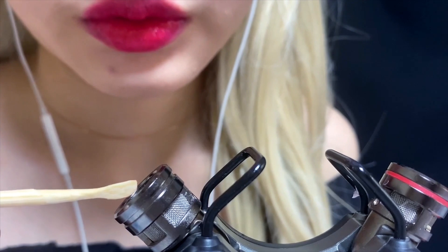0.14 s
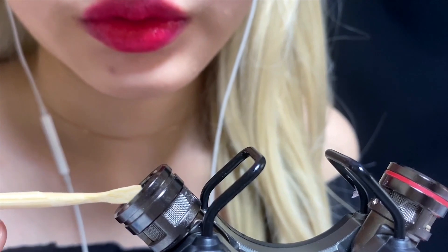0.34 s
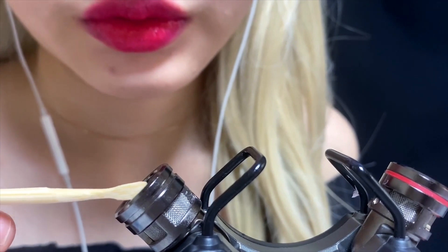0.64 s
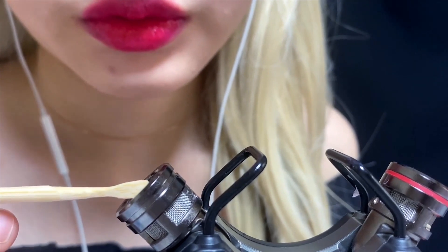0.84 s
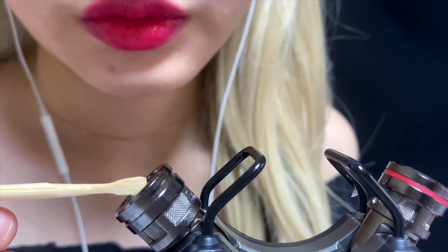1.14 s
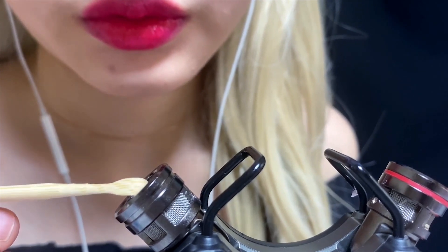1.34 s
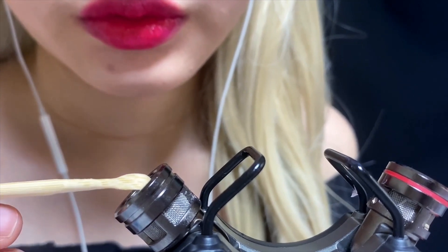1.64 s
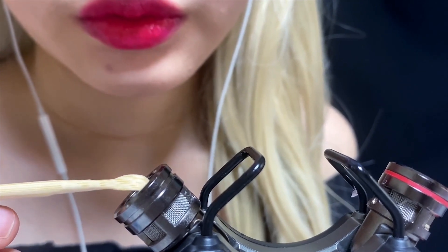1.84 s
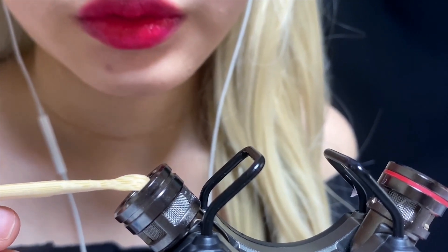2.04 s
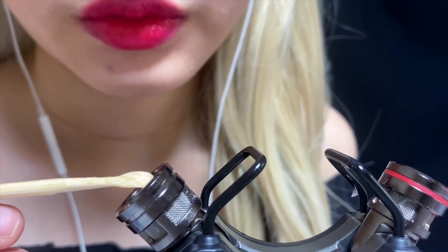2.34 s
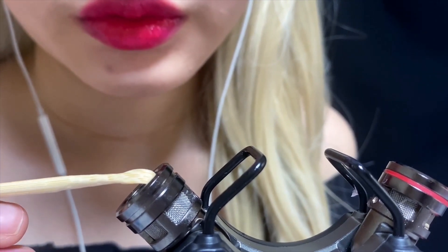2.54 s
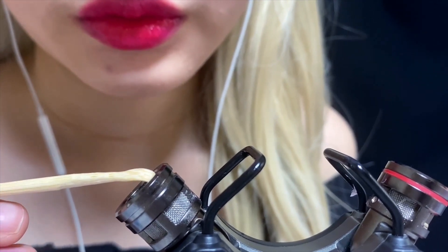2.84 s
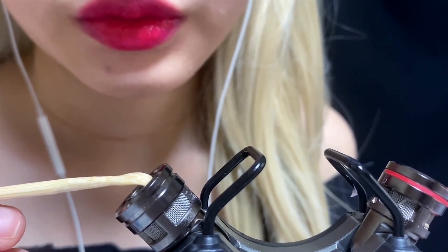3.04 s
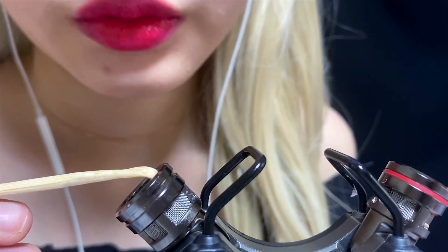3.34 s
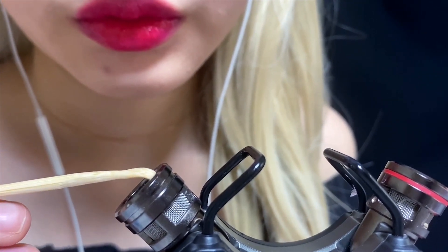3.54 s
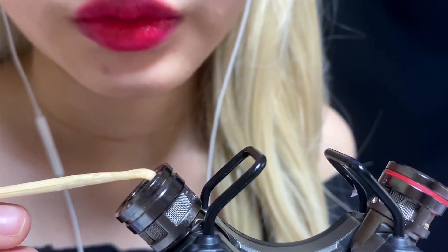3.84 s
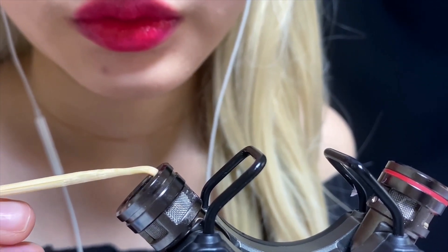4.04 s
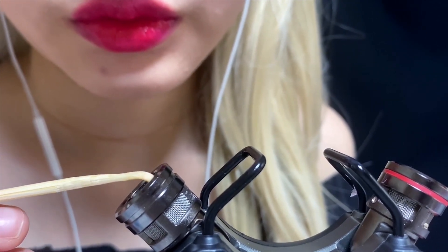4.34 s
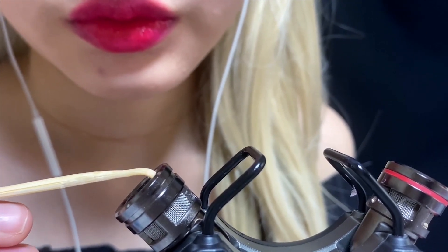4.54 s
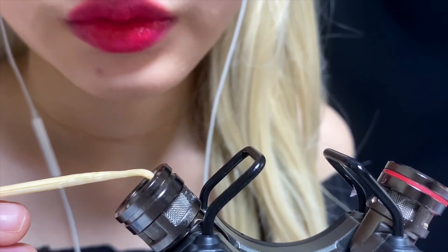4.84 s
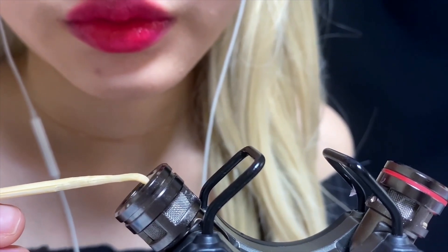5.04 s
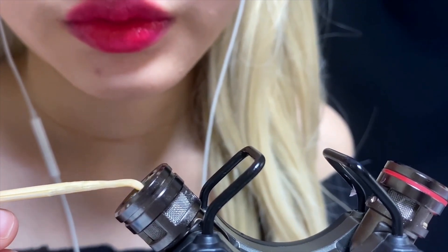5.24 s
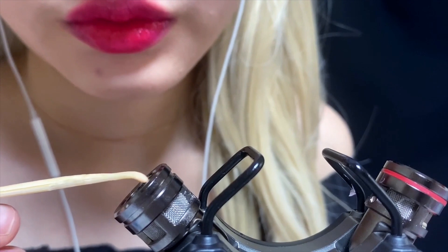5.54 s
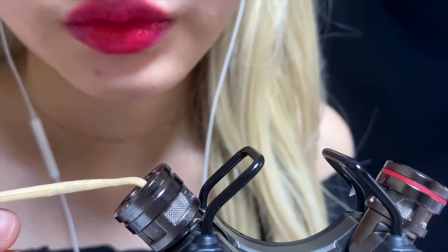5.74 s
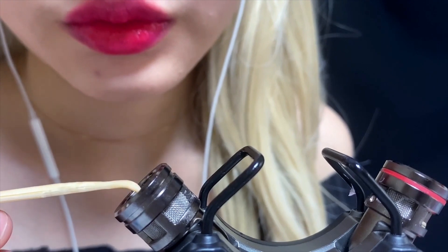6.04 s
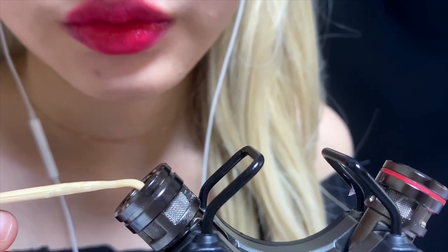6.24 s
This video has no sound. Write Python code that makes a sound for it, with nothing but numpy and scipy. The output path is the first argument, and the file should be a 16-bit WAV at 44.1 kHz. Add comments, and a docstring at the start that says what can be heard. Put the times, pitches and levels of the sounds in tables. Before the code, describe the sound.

Close dry scratching and clicking of a wooden stick on a microphone grille, sparse at first, then busier, over faint room hiss.

```python
"""In a quiet room, a wooden ear pick pokes and scrapes the mesh of the right capsule of a stereo microphone pair.
Each poke or slip is a short push on the grille; dragging makes dense stick-slip grains and a thin rub.
The left capsule hears it mainly through the ringing mount, which also rocks at a low pitch.
Contact sounds are pulses and noise shaped by resonances; quiet hiss and a fading midrange wash lie beneath."""
import sys
import numpy as np
from scipy.fft import rfft, irfft, next_fast_len
from scipy.io import wavfile
from scipy.ndimage import uniform_filter1d, map_coordinates

SR = 44100
rng = np.random.default_rng(int(sys.argv[2]) if len(sys.argv) > 2 else 0)


def output_pcm(signal):
    """Save a mono or channel-first signal as 16-bit PCM at the path in sys.argv[1].

    Samples are clipped to [-1, 1] before scaling.
    """
    pcm = np.clip(np.atleast_2d(signal).T, -1, 1) * 32767
    wavfile.write(sys.argv[1], SR, np.round(pcm).astype(np.int16))


N = 281117  # length [samples]


def amp(db):
    """Logarithmic level: decibels to amplitude gain."""
    return 10 ** (np.asarray(db) / 20)


def unit(x):
    """Power normalisation: scale to rms 1."""
    return x / np.sqrt(np.mean(x ** 2) + 1e-20)


def noise(*shape):
    """White Gaussian noise: equal mean power at all frequencies."""
    return rng.standard_normal(shape + (N,))


def filtered(x, response):
    """Linear filtering: the spectrum of x times a complex response of frequency."""
    size = 2 * next_fast_len(N // 2 + SR // 4)  # zero padding leaves room for the ringing
    spectrum = rfft(x, size)
    hz = np.fft.rfftfreq(size, 1 / SR)
    return irfft(spectrum * response(hz), size)[..., :N]


def colour(points):
    """Minimum phase: a causal response through (frequency [Hz], level [dB]) points."""
    def response(hz):
        f, db = np.transpose(points)
        level_db = np.interp(np.log(hz + 1), np.log(f), db)
        cepstrum = irfft(np.log(amp(level_db)))
        half = len(cepstrum) // 2
        # folding the cepstrum onto positive times makes the response causal
        cepstrum[1:half] *= 2
        cepstrum[half + 1:] = 0
        return np.exp(rfft(cepstrum))
    return response


def modes(table):
    """Modal superposition: a causal sum of (frequency [Hz], width [Hz], level [dB]) resonances."""
    def response(f):
        total = 0
        for k, (centre, width, db) in enumerate(table):
            resonance = 1j * f * width / (centre * centre - f * f + 1j * f * width)
            total = total + (-1) ** k * amp(db) * resonance  # successive modes alternate in sign
        return total
    return response


def boosted(points, table):
    """Resonant emphasis: a causal colour with narrow (frequency [Hz], width [Hz], level [dB]) peaks on top."""
    def response(f):
        peaks = [1 + (amp(db) - 1) * modes([(centre, width, 0)])(f) for centre, width, db in table]
        return colour(points)(f) * np.prod(peaks, axis=0)
    return response


def grains(rate, spread_db):
    """Poisson-like impulses: tiny catches at random moments and of random size, rate a second."""
    happens = rng.random(N) < rate / SR
    sign = rng.choice([-1, 1], N)
    return happens * sign * amp(spread_db * noise())


def even(x, seconds):
    """Envelope normalisation: hold the running rms near 1 and keep the finer grain."""
    x = unit(x)
    size = max(int(seconds * SR), 2)
    power = uniform_filter1d(uniform_filter1d(x ** 2, size), size)
    return x / np.sqrt(np.abs(power) + 1e-3)


def wobble(rate):
    """Band-limited fluctuation: a smooth random curve, rate knots a second."""
    knots = rng.standard_normal(int(N * rate / SR) + 4)
    return map_coordinates(knots, [np.arange(N) * rate / SR])


def add(track, s, sound):
    """Superposition: mix a short sound in at time s."""
    part = track[max(round(s * SR), 0):][:len(sound)]
    part += sound[:len(part)]


def gesture(start, length, attack, release, swell_db=0):
    """Exponential envelope of one movement: rise, a hold that swells or fades, fall."""
    t = np.arange(N) / SR - start
    outside = np.maximum(-t, 0) / attack + np.maximum(t - length, 0) / release
    near = outside < 10
    progress = np.clip(t[near] / length, 0, 1)
    gain = np.zeros(N)
    gain[near] = np.exp(-outside[near]) * amp(swell_db * (progress - .5))
    return gain


# spectrum of the quiet room and preamplifier: (frequency [Hz], relative density [dB per Hz])
FLOOR = [(20, -78.5), (60, -83), (120, -91.5), (250, -93.5), (600, -103.5), (950, -105), (1400, -108),
         (1950, -107), (2700, -113), (9000, -113.5), (16000, -115)]
# spectrum of a faint midrange wash in the room: (frequency [Hz], relative density [dB per Hz])
WASH = [(300, -12.5), (950, 1), (1400, -5.5), (1950, -2), (2600, -8.5), (4000, -20)]
WASH_DB, WASH_FADE_DB_PER_S = -70.5, 0.46


def floor():
    """Incoherent noise: steady hiss, separate in each capsule, and a midrange wash that slowly fades."""
    hiss = amp(-61.0) * unit(filtered(noise(2), colour(FLOOR)))
    wash = unit(filtered(noise(2), colour(WASH)))
    wash_gain = amp(WASH_DB - WASH_FADE_DB_PER_S * np.arange(N) / SR)
    return hiss + wash_gain * wash


# strokes of the pick over the mesh, levels relative within each layer:
# (start [s], length [s], swell from start to end [dB], stick-slip [dB], smooth rub [dB],
#  mesh grit [dB], rocking of the mount [dB])
STROKES = [(0.377, .18, -6, -67, -82, -88, -56), (0.59, 0.068, 5, -49, -59.5, -72, -50),
           (0.659, 0.043, -2, -50.5, -67, -76, -45), (0.974, 0.16, -1, -61, -68, -90, -76),
           (1.347, 0.13, 10, -54, -65.5, -79, -54), (1.545, 0.015, 3, -40.5, -75, -83, -58),
           (1.69, 0.022, 10, -29, -54, -56, -52), (1.727, 0.064, -16, -49, -68, -70, -52),
           (2.079, 0.018, 6, -49.5, -65, -82, -46), (2.236, 0.026, 6, -58.5, -60.5, -80, -50),
           (2.376, 0.044, 1, -51.5, -47.5, -64, -42), (2.617, 0.057, -10.5, -43, -52, -76, -39.5),
           (2.845, .025, 7.5, -40.5, -66, -78, -51.5), (2.883, 0.11, -6, -51, -59, -79, -58),
           (3.188, 0.099, -7, -50.5, -52.5, -73, -39.5), (3.309, 0.038, -7, -52.5, -53, -79, -40),
           (3.365, 0.03, 6, -44.5, -56.5, -72, -47), (3.555, .022, 11, -44, -59, -72, -51),
           (3.615, 0.068, -19, -47.5, -56, -81, -51), (3.792, 0.062, 6, -47.5, -51, -78, -41),
           (3.876, 0.062, 2, -48, -49.5, -71.5, -39.5), (4.081, 0.029, -0.5, -37.5, -42.5, -69, -45),
           (4.179, 0.049, 18.5, -35, -51, -68, -56), (4.245, 0.034, -14.5, -39.5, -51.5, -63, -46),
           (4.373, 0.071, 10, -57, -64.5, -82, -55), (4.453, 0.02, 3.5, -37, -45, -61, -39.5),
           (4.552, 0.012, 0, -28, -44, -66, -54), (4.564, 0.0052, -3.5, -27, -30, -43, -31),
           (4.601, 0.02, -8, -29, -40.5, -56, -36.5), (4.631, 0.04, -16, -56, -63, -83, -43),
           (4.81, 0.037, -7, -46.5, -48, -84, -41), (4.844, .18, 0, -55, -57.5, -75, -52),
           (5.037, 0.18, -1, -61, -61.5, -82, -51.5), (5.222, 0.077, 1, -53.5, -53.5, -80, -49),
           (5.417, 0.026, -1, -45, -50.5, -75, -44), (5.698, 0.039, -1, -47, -60, -71, -46),
           (5.755, 0.055, -7.5, -32.5, -49, -59.5, -48), (5.825, 0.0083, 0, -22.5, -37, -53, -41),
           (5.838, 0.062, -9.5, -38.5, -55, -60, -52), (6.012, 0.019, -6, -55.5, -56.5, -72, -50),
           (6.304, 0.061, -5, -51.5, -62, -69.5, -55)]


def stroking(attack, release):
    """Energy addition: gains of stick-slip, rub, grit and rocking, summed in power over all strokes."""
    power = np.zeros((4, N))
    for start, length, swell_db, *levels_db in STROKES:
        gain = gesture(start, length, attack, release, swell_db)
        near = gain > 0
        power[:, near] += np.outer(amp(levels_db), gain[near]) ** 2
    return np.sqrt(power)


# the hand leans on the capsule through the resting pick: (start [s], length [s], relative flexing [dB])
LEANS = [(0.507, 0.095, -37), (1.69, 0.055, -31), (2.109, 0.21, -34.5), (2.361, 0.074, -28.5),
         (2.462, 0.4, -41.5), (3.27, 0.15, -37), (5.784, 0.15, -29), (5.983, 0.25, -36.5)]


def leaning():
    """Quasi-static loading: the gain of the flexing rises and falls with the hand's pressure."""
    return sum(amp(db) * gesture(start, length, attack=0.0057, release=0.014) for start, length, db in LEANS)


# deep flexing of the pressed capsule: (frequency [Hz], relative density [dB per Hz])
FLEX = [(8, -8), (25, -0.5), (55, 2), (90, -12.5), (160, -31.5), (1000, -71)]
FLEX_PER_SLIP_DB, REST_FLEX_DB = -3.5, -53.5  # friction also flexes the capsule; the held pick is never quite still


def flexing(friction):
    """Forced elastic deformation: pressure and friction drive low-frequency noise in the touched capsule."""
    touched = np.hypot(leaning(), amp(FLEX_PER_SLIP_DB) * friction) + amp(REST_FLEX_DB)
    return touched * even(filtered(noise(), colour(FLEX)), 0.11)


# rocking of the mount: (frequency [Hz], relative density [dB per Hz])
SWAY = [(10, -13), (35, -9), (68, 0.5), (95, -6.5), (150, -17), (260, -26), (1500, -76)]
# the arm of the mount swings at one pitch: (frequency [Hz], width [Hz], peak over the rocking colour [dB])
ARM = [(63.3, 18, 2.5)]
SWAY_ATTACK_S, SWAY_RELEASE_S = 0.0069, 0.021  # the heavy mount follows more slowly than the tip
REST_ROCK_DB = -72


def rumble():
    """Low-frequency resonance: the hand flexes the capsule and rocks the mount, swinging the capsules oppositely."""
    friction, _, _, rocking = stroking(SWAY_ATTACK_S, SWAY_RELEASE_S)
    rocking = np.hypot(rocking, amp(REST_ROCK_DB))
    flex = flexing(friction)
    sway = rocking * even(filtered(noise(), boosted(SWAY, ARM)), 0.068)
    twist = rocking * even(filtered(noise(), colour(SWAY)), 0.012)
    left = 0.65 * twist - 0.6 * sway
    right = amp(-4.5) * flex + amp(2.0) * sway
    return np.array([left, right])


# smooth wood gliding on the mesh: (frequency [Hz], relative density [dB per Hz])
RUB = [(300, 3.5), (700, -3), (1500, -7.5), (2600, 5), (3100, -2), (3900, -19.5)]
# the capsule housing under a light rub: (frequency [Hz], width [Hz], peak over the rub colour [dB])
HOUSING = [(963, 68, 15.5), (1160, 120, 10.5), (1926, 60, -7.5)]


def smooth_rub(fibres):
    """Sliding friction: a dense run of tiny contacts excites the housing's resonances."""
    return even(filtered(fibres, boosted(RUB, HOUSING)), 0.018)


# stick-slip on the grille: (frequency [Hz], relative density [dB per Hz])
SLIPS = [(40, -22), (140, 8.5), (280, 4), (480, -4), (700, -6.5), (950, -11.5), (1400, -18.5), (2200, -29),
         (4000, -47.5)]
# the cap of the grille: (frequency [Hz], width [Hz], peak over the stick-slip colour [dB])
GRILLE = [(627, 35, 3), (732, 39, 8), (900, 51, -4), (1109, 52, 6.5)]


def stick_slip(catches):
    """Stick-slip friction: each catch of the tip releases a pulse that rings the cap of the grille."""
    return even(filtered(catches, boosted(SLIPS, GRILLE)), 0.015)


# wood fibres on the wires: (frequency [Hz], relative density [dB per Hz])
GRIT = [(1000, 2.5), (2500, 5.5), (3200, -0.5), (4500, 1.5), (8000, -13.5), (11000, -8.5), (16000, -23)]
# single wires ringing: (frequency [Hz], width [Hz], peak over the grit colour [dB])
WIRES = [(3920, 350, 3), (5430, 88, 2), (9840, 200, 6), (10720, 220, 4.5)]


def rasp(x):
    """Resonant excitation: a broad crackle of the mesh with the wires ringing in it."""
    return filtered(x, boosted(GRIT, WIRES))


# the mesh sings faintly when stroked lightly: (frequency [Hz], width [Hz], relative level [dB])
MESH = [(5870, 320, -4), (9100, 410, -1)]


def mesh_song(fibres):
    """Modal ringing: a light stroke keeps two bands of the mesh singing."""
    return even(filtered(fibres, modes(MESH)), 0.029)


# the mount as the left capsule hears it: (frequency [Hz], width [Hz], relative level [dB])
MOUNT = [(700, 50, -4), (838, 21, 4.5), (932, 41, 0.5), (1200, 92, -18.5), (1880, 104, -16),
         (2225, 150, -9.5), (2620, 140, -15.5)]


def mount_ring(excitation):
    """Structure-borne sound: contact forces excite the normal modes of the mount."""
    return filtered(excitation, modes(MOUNT))


STROKE_ATTACK_S, STROKE_RELEASE_S = 0.0031, 0.0059  # the tip bites and lifts
REST_RUB_DB = -84  # the held pick still rubs a little


def drag():
    """Friction-driven vibration: the tip catches and slips over the wires; a light touch rubs and sings."""
    slip_gain, rub_gain, grit_gain, _ = stroking(STROKE_ATTACK_S, STROKE_RELEASE_S)
    rub_gain = np.hypot(rub_gain, amp(REST_RUB_DB))
    rub_gain = rub_gain * amp(3.14 * wobble(45))  # the tip never glides quite evenly
    catches = grains(rate=750, spread_db=5.0)
    fibres = grains(rate=2500, spread_db=4.5)
    slips = slip_gain * stick_slip(catches)
    rub = rub_gain * smooth_rub(fibres)
    grit = grit_gain * even(rasp(fibres + catches), 0.0065)
    light = rub_gain / (1 + slip_gain / amp(-61))  # firm pressure damps the mesh
    mesh = light * mesh_song(fibres)
    shake = np.hypot(amp(-7.5) * rub_gain, amp(-22.5) * slip_gain)
    ring = shake * even(mount_ring(fibres + .5 * catches), .025)
    travel_s = 0.00057  # along the mount
    ring = filtered(ring, lambda hz: np.exp(-2j * np.pi * hz * travel_s))
    left = ring + amp(-12) * grit - amp(-22) * slips
    right = amp(-2.0) * slips + amp(-6.5) * rub + amp(0.5) * grit + amp(-14.5) * mesh
    return np.array([left, right])


# grille colour for a push: (frequency [Hz], relative level [dB])
PUSH = [(20, -26.5), (60, 3.5), (130, 3), (400, 1), (720, 2), (950, -0.5), (1450, -8), (2050, -2),
        (2550, 7.5), (3200, -9), (8000, -9.5)]


def thud(push):
    """Impulse response: the grille colours each contact force into a thud."""
    return amp(-3.0) * filtered(push, colour(PUSH))


# pokes and slips, levels relative within each layer:
# (time [s], push peak before colouring [dB], contact time [ms], crackle [dB], mount ring [dB])
POKES = [(0.3706, -32, 0.22, -67.5, -48), (0.529, -36, 0.79, -66, -43), (0.592, -33, 0.71, -66, -42),
         (0.6497, -26.5, 0.33, -58, -40), (1.077, -6, 0.19, -44.5, -22), (1.289, -31.5, 0.85, -70.5, -73.0),
         (1.3676, -26.5, 0.26, -64, -70.0), (1.4506, -32.5, 0.66, -65, -39),
         (1.461, -27.5, 0.23, -69, -58.0), (1.5393, -27.5, 0.54, -54.5, -40),
         (1.549, -31.5, 0.66, -72, -51), (1.692, -18.5, 0.86, -55, -44), (1.7047, -8, 0.18, -45.5, -52),
         (1.71, -23, 1, -52, -54), (1.871, -36, 0.9, -72, -73.0), (2.0961, -31, 0.33, -68, -57),
         (2.3767, -24.5, 0.71, -63.5, -27), (2.4614, -30, 0.49, -77, -70), (2.6371, -34, 0.65, -64, -60),
         (2.6696, -18.5, 0.35, -61, -33), (2.8613, -32, 0.088, -57, -58.0), (2.8678, -23, 0.18, -57, -53),
         (2.9697, -32, 0.37, -73, -67), (3.2683, -22.5, 0.13, -68, -32), (3.3878, -25.5, 0.21, -63, -56),
         (3.3963, -28, 0.78, -65.5, -50), (3.5555, -28.5, 0.26, -70, -48), (3.5746, -23, 0.17, -54.5, -31),
         (3.6075, -29, 0.28, -72.0, -60), (3.618, -22.5, 0.3, -66, -56), (3.969, -38.5, 0.16, -76, -60),
         (4.0761, -9.5, 0.17, -51.5, -25), (4.1063, -21, 0.19, -52.5, -34), (4.2115, -18.5, 0.48, -59, -53),
         (4.2273, -14, 0.12, -54, -31), (4.4676, -19.5, 0.21, -52.5, -48), (4.5465, -17.5, 0.42, -57, -36),
         (4.566, -15, 0.081, -39.5, -19.5), (4.5975, -13.5, 0.24, -77, -47), (4.806, -20, 0.3, -64, -46),
         (4.937, -49, 0.1, -74, -60), (5.232, -32, 1, -71, -53), (5.2952, -27, 0.25, -79, -44),
         (5.6577, -14, 0.13, -58.5, -38), (5.7515, -18, 0.31, -54.5, -52), (5.7639, -15, 0.28, -48.5, -53),
         (5.775, -21, 0.3, -54, -45), (5.79, -22.5, 0.6, -72, -37), (5.8282, -12.5, 0.16, -39, -24),
         (5.876, -21, 0.23, -52, -32), (6.2808, -19, 0.28, -60, -72), (6.361, -50, 0.1, -65, -60)]


def pokes():
    """Impact excitation: each contact pushes the grille, crackles on the wires and rings the mount."""
    push, crackle, blows = np.zeros((3, N))
    t = np.arange(SR // 20) / SR
    # the wires creak just before they let go
    build_up, release = np.exp(-t[::-1] / 0.0011), np.exp(-t / 0.00069)
    creaking = np.concatenate([build_up, release])
    for s, db, contact_ms, crackle_db, ring_db in POKES:
        u = t * 1000 / max(contact_ms, .1)
        pulse = (u / 2) ** 2 * np.exp(2 - u)  # peaks at 1; a shorter contact is brighter
        add(push, s, amp(db) * pulse)
        add(crackle, s + 0.00064 - t[-1], amp(crackle_db + 4.0) * creaking)
        add(blows, s + 0.00067, amp([ring_db + 27]))
    bounce = filtered(push, modes([(78.3, 53, 0.43)]))  # the capsule springs back on its arm
    snap = crackle * even(rasp(noise()), 0.0038)
    creak = filtered(crackle * noise(), modes([(756, 102, 38.8)]))  # rough slips ring the cap
    left = mount_ring(blows) + amp(-55) * snap - amp(-16.0) * bounce
    right = thud(push) + bounce + snap + creak
    return np.array([left, right])


def scene():
    """Linear superposition: the contact sounds reach the capsules directly, so no reverberation is added."""
    return floor() + rumble() + drag() + pokes()


TOP_HZ = 15870


def record(dry):
    """Band limitation: the recorder keeps nothing above its upper limit."""
    return filtered(dry, lambda hz: hz < TOP_HZ)


dry = scene()
out = record(dry)
output_pcm(out)
```